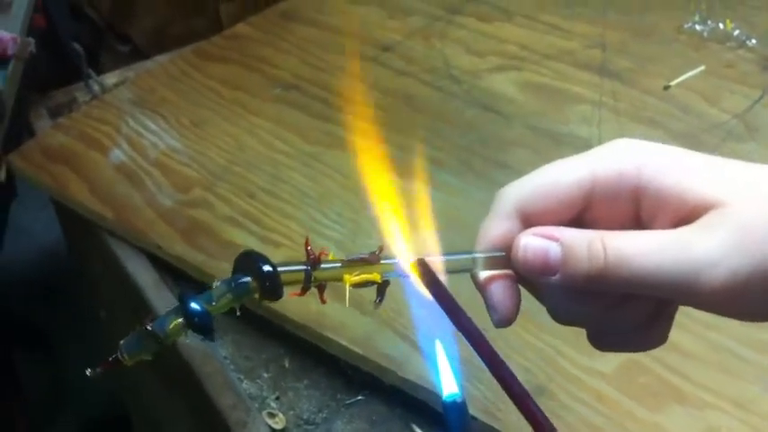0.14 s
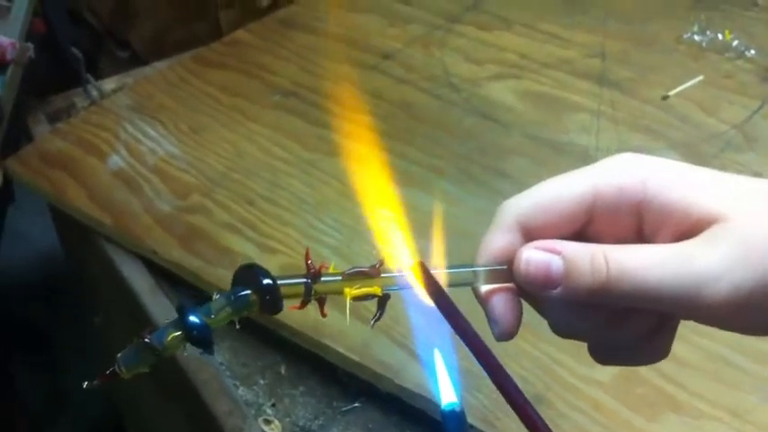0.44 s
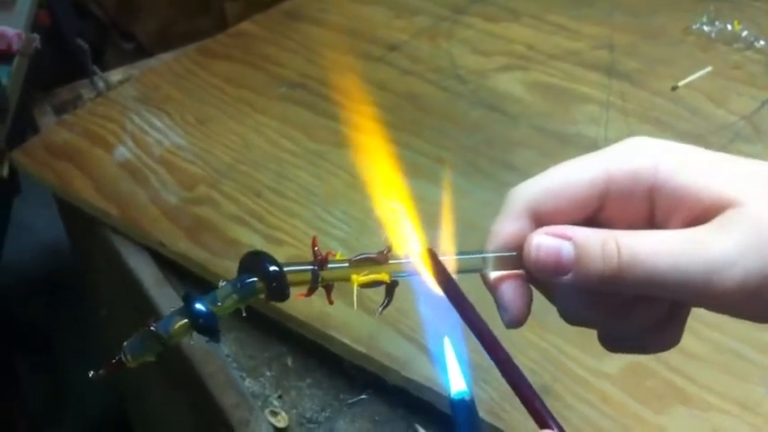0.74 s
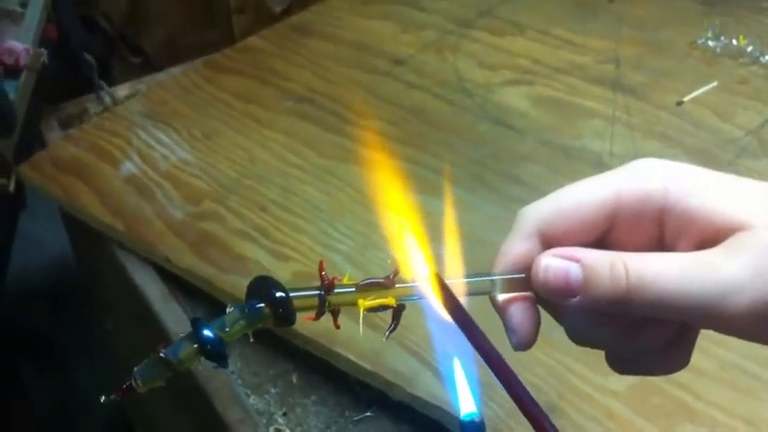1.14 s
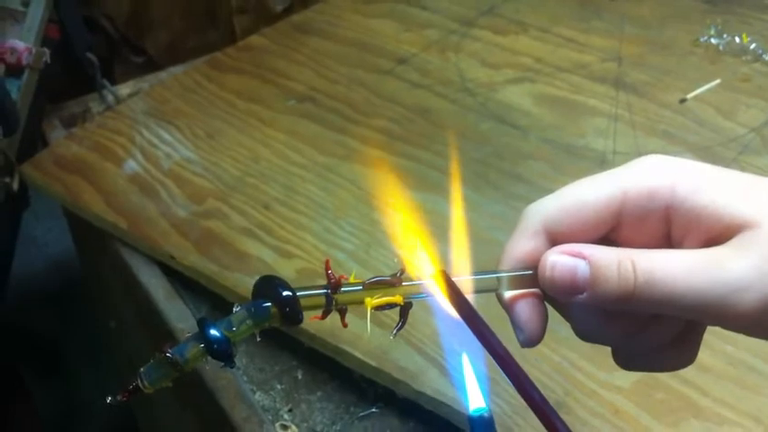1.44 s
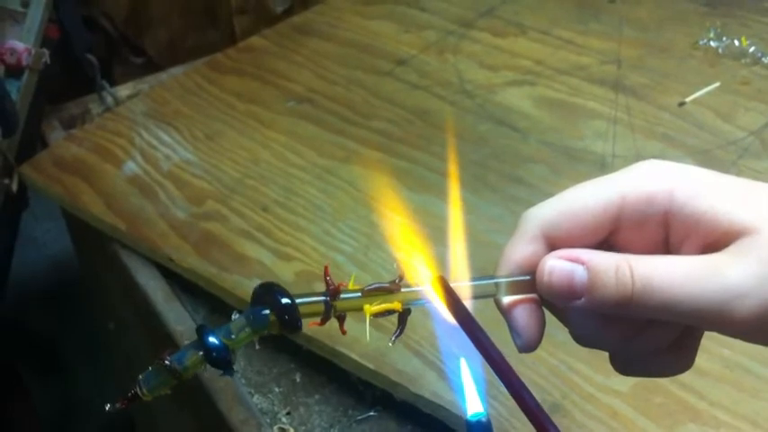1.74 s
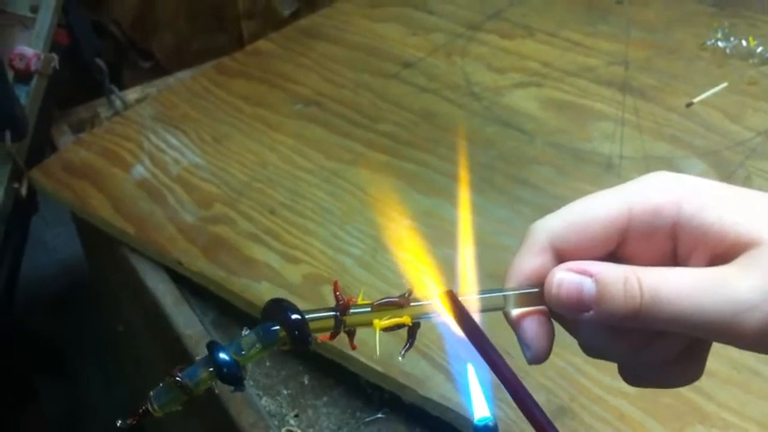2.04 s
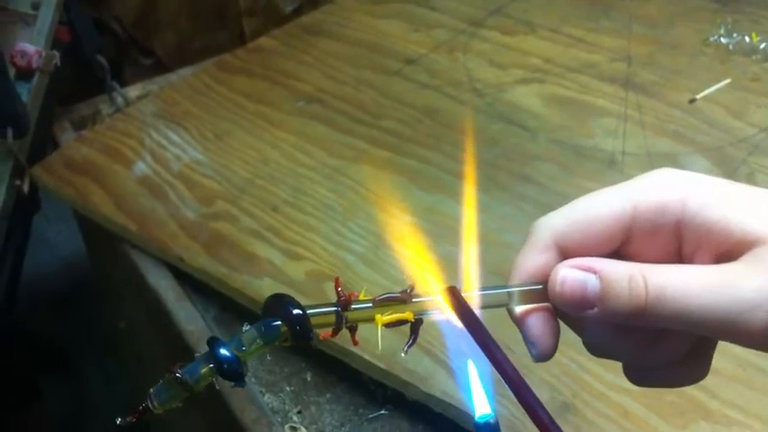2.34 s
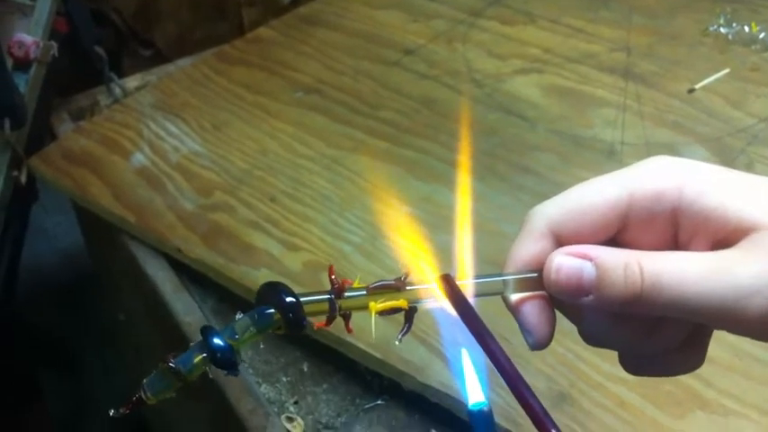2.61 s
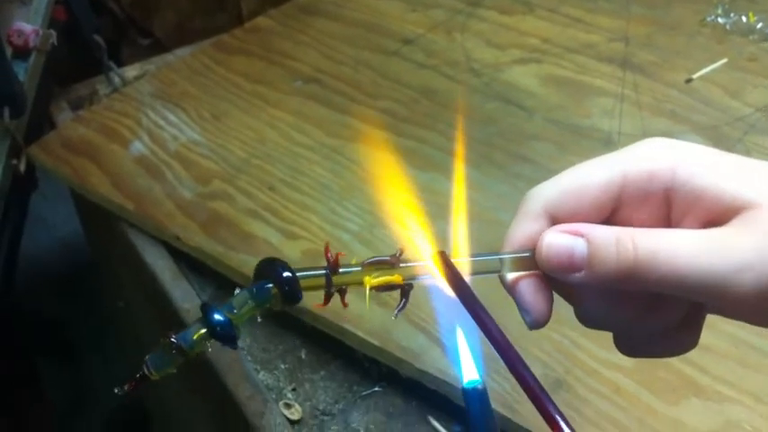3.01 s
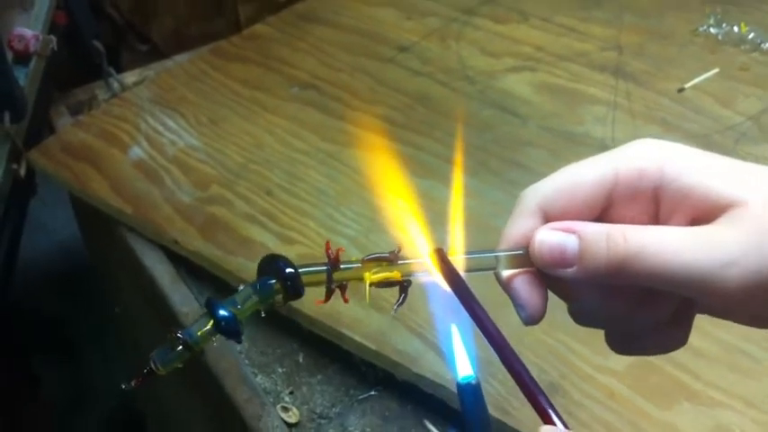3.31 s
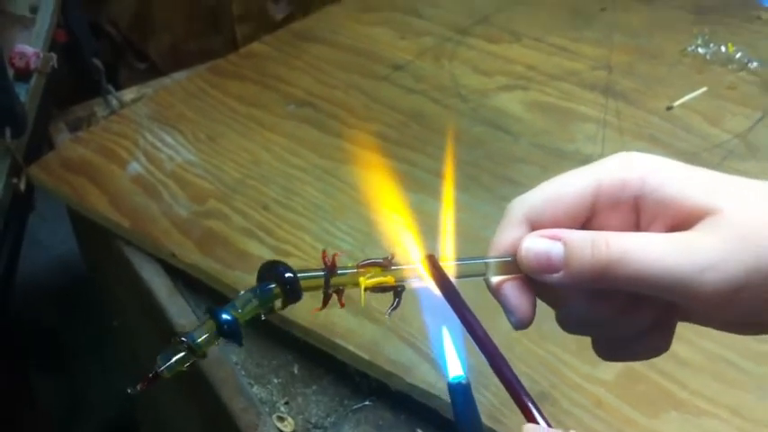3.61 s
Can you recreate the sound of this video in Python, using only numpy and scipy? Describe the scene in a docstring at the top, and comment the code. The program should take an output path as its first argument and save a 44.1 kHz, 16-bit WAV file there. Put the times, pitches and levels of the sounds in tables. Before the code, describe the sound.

A gas torch burns close to the microphone in a small workshop, its rough fluttering roar and steady high hiss continuous throughout, with irregular sputters and a few faint glassy ticks.

```python
"""A small workshop: a glassworker's gas torch burns over a wooden workbench.
The flame's roar is a dense stream of filtered random pops with brief flares, lulls and louder sputters;
a finer stream of pops makes its sizzle. The gas jet hisses as noise in narrow resonances,
faint ticks are decaying noise bursts, and a motor hums as two wavering sines over low room noise."""
import sys
import numpy as np
from scipy import signal
from scipy.fft import rfft, irfft
from scipy.io import wavfile
from scipy.ndimage import uniform_filter1d

SR = 44100
rng = np.random.default_rng(int(sys.argv[2]) if len(sys.argv) > 2 else 0)


def unload_wav(signal):
    """Save mono or channel-first audio to the path in sys.argv[1] as 16-bit WAV at rate SR, clipped to [-1, 1]."""
    wavfile.write(
        sys.argv[1],
        SR,
        np.round(np.clip(np.atleast_2d(signal).T, -1, 1) * 32767).astype(np.int16),
    )


N = 165816
SIZE = 8192  # filter length [samples]
FREQ = np.maximum(np.fft.rfftfreq(SIZE, 1 / SR), 1)  # [Hz]
T = np.arange(N) / SR  # [s]
FLUTTER_HZ = 169.2

# colour of the flame's roar: (frequency [Hz], relative density [dB per Hz])
ROAR_COLOUR = [(94, -41.5), (160, -15.5), (200, -12.5), (250, -10), (335, -7.5), (422, -13.5), (458, -9),
               (498, -12), (619, -4), (800, -2), (1030, -1.5), (1530, -11), (1900, -5), (2180, -7),
               (2330, -13.5), (2830, -18), (3070, -27), (3370, -17), (4200, -31), (5460, -50), (9240, -120)]


def undb(db):
    """Decibels to gain."""
    return 10 ** (np.asarray(db) / 20)


def level(x, db):
    """Scale to an rms level [dB]."""
    rms = np.sqrt(np.mean(x ** 2))
    return x * undb(db) / rms


def curve(points):
    """Interpolate (time [s], level [dB]) points over the scene."""
    time_s, db = np.array(points).T
    return np.interp(T, time_s, db)


def colour(points):
    """Gain over FREQ from (frequency [Hz], level [dB]) points, linear in dB over log frequency."""
    hz, db = np.array(points).T
    return undb(np.interp(np.log(FREQ), np.log(hz), db))


def band(low_hz, high_hz):
    """Band-pass gain with 24 dB per octave skirts."""
    low_cut = 1 / np.hypot(1, (low_hz / FREQ) ** 4)
    high_cut = 1 / np.hypot(1, (FREQ / high_hz) ** 4)
    return low_cut * high_cut


def tilt(db_per_octave):
    """Gain with a constant slope, 0 dB at 1 kHz."""
    return undb(db_per_octave * np.log2(FREQ / 1000))


def resonance(hz, width_hz):
    """Complex response of one resonance, gain 1 at its centre."""
    return 1 / (1 + 1j * (FREQ ** 2 - hz ** 2) / (FREQ * width_hz))


def impulse(gain):
    """Minimum-phase impulse response with this gain, by folding the cepstrum."""
    cepstrum = irfft(np.log(np.abs(gain) + 1e-6))
    cepstrum[1:SIZE // 2] *= 2
    cepstrum[SIZE // 2 + 1:] = 0
    return irfft(np.exp(rfft(cepstrum)))


def through(x, response):
    """Convolve a sound with an impulse response."""
    return signal.fftconvolve(x, response)[:N]


def walk(rate_hz):
    """Smooth random motion, rms 1: held random steps averaged twice."""
    hold = max(int(SR / rate_hz), 1)
    steps = np.repeat(rng.standard_normal(N)[:N // hold + 1], hold)
    smooth = uniform_filter1d(uniform_filter1d(steps, hold), hold)
    return level(smooth[:N], 0)


def pops(rate_per_s, spread_db):
    """Randomly timed pulses of either sign, mostly small and a few large."""
    fires = rng.random(N) < rate_per_s / SR
    size_db = spread_db * np.minimum(rng.exponential(size=N), 4)
    return fires * undb(size_db) * rng.choice([-1, 1], N)


def add(out, start_s, sound, peak_db):
    """Mix a short sound in at a given peak level."""
    i = max(int(start_s * SR), 0)
    scaled = sound * undb(peak_db) / np.abs(sound).max()
    out[i:i + len(sound)] += scaled[:N - i]


def turbulence():
    """Strength of the burning [dB]: a fast random flutter plus brief Gaussian flares and lulls."""
    # (centre [s], Gaussian half length [s], change [dB])
    flare_table = [(0.08, 0.047, -1), (0.166, 0.018, 6), (0.308, 0.0067, 5), (0.366, 0.0072, 7),
                   (.503, 0.0056, -10), (0.567, 0.017, 4), (0.636, 0.0051, -1.5), (0.702, 0.014, -4),
                   (.742, 0.0077, 4), (.869, 0.0066, 5.5), (1.096, 0.01, 7.5), (1.325, 0.014, 4),
                   (1.366, 0.011, -3.5), (1.588, 0.039, 2.5), (1.747, 0.013, 1.5), (2.001, 0.013, -7),
                   (2.194, 0.1, 1.5), (2.414, 0.016, 1), (2.538, 0.013, 3.5), (2.66, 0.014, 0.5),
                   (2.712, .012, -2), (2.807, 0.0075, 7.5), (2.832, .015, 0.5), (2.883, 0.0096, -8),
                   (2.902, 0.006, 4), (3.043, 0.0062, 0), (3.534, 0.017, 3)]
    flutter_db = 1.35
    flares_db = sum(db * np.exp(-.5 * ((T - centre_s) / half_s) ** 2)
                    for centre_s, half_s, db in flare_table)
    return flutter_db * walk(FLUTTER_HZ) + flares_db


def roar(effort_db):
    """Countless small pops merge into a roar whose registers flutter partly on their own."""
    # (low edge [Hz], high edge [Hz], pop spread [dB], own flutter [dB], share of common effort [1])
    registers = [(150, 557, 2, 1.5, 0.22), (516, 1440, 3.5, 1.5, 0.53), (1410, 3380, 2.4, 1.5, 0.9)]
    pops_per_s, roar_db = 3200, -51.5
    out = np.zeros(N)
    for low_hz, high_hz, spread_db, own_db, share in registers:
        flutter_db = share * effort_db + own_db * walk(FLUTTER_HZ)
        pulses = level(pops(pops_per_s, spread_db) * undb(flutter_db), 0)
        out += through(pulses, impulse(colour(ROAR_COLOUR) * band(low_hz, high_hz)))
    return level(out, roar_db)


def sputters():
    """Larger gas pockets burn at once: pops ringing briefly in the roar's colour, dull or bright."""
    # (peak time [s], peak level before trim [dB], brightness [dB per octave])
    sputter_table = [(0.052, -35.5, -7), (0.1626, -36, 17), (.1714, -40, 2), (0.2334, -34, 2),
                     (0.3288, -38, 1), (0.363, -34, 2), (.4093, -35, -5), (0.5624, -32, 7),
                     (0.7428, -32.5, 0.5), (.8698, -35.5, 7), (1.0847, -34, -6), (1.0964, -36, 1),
                     (1.1002, -28.5, 0), (1.2919, -33, -7), (1.3351, -35, -10), (1.4935, -31, -3.5),
                     (1.5063, -41, 2), (1.6914, -34, -6), (1.7172, -42, 6), (1.7554, -29, -2),
                     (1.7907, -38, -5), (1.913, -36, -12), (1.9872, -35.5, -4), (2.0996, -36, -3),
                     (2.115, -36, 16), (2.1591, -34, -1.5), (2.5365, -35, -1), (2.562, -32, 4),
                     (2.6518, -37, -4), (2.6649, -36, 5), (2.8021, -33, -5), (2.8087, -36, -9),
                     (2.8317, -40, -6), (2.899, -31, 4.5), (2.9025, -34, -5), (3.0467, -31, 3.5),
                     (3.2327, -40, 9), (3.319, -33.5, -1), (3.5521, -35, 1), (3.6835, -35, 1)]
    trim_db, low_hz, high_hz = -3.5, 530, 2395
    out = np.zeros(N)
    body = colour(ROAR_COLOUR) * band(low_hz, high_hz)
    for peak_s, db, bright_db in sputter_table:
        pop = impulse(body * tilt(bright_db))
        rise_s = np.abs(pop).argmax() / SR
        add(out, peak_s - rise_s, pop, db + trim_db)
    return out


def sizzle(effort_db):
    """Dense fine pops, stronger as the flame flares, with a surge of their own."""
    # (frequency [Hz], relative density [dB per Hz])
    sizzle_colour = [(2500, -26), (3900, 1.5), (4600, 3.5), (5500, 1.5), (6800, 3), (7400, -30), (9000, 0),
                     (15000, -14)]
    # (time [s], level [dB])
    sizzle_level = [(0, -68), (.5, -66.5), (1.2, -70), (1.8, -71.5), (2.6, -68.5), (3.1, -74), (3.7, -70)]
    surge_hz, surge_db = 54.9, 4
    follow = 1.07  # dB of sizzle per dB of effort
    strength_db = follow * effort_db + surge_db * walk(surge_hz)
    pulses = pops(rate_per_s=10000, spread_db=2) * undb(strength_db)
    fizz = level(through(pulses, impulse(colour(sizzle_colour))), 0)
    return fizz * undb(curve(sizzle_level))


def flame():
    """Roar and sputters ring the resonances of bench and surroundings; sizzle is added uncoloured."""
    # (frequency [Hz], width [Hz], gain re direct sound [dB])
    bench_modes = [(455, 25, -16), (1015.5, 26, -3), (1176, 37, -20.5), (1426, 22, -4), (1632, 33, -2),
                   (1700, 26, -8), (1878, 43, -2.5), (2180, 71, -14.5), (2477, 22, -8)]
    effort_db = turbulence()
    modes = sum(undb(db) * resonance(hz, width_hz) for hz, width_hz, db in bench_modes)
    bench = irfft(1 + modes)  # 1 = direct sound
    return through(roar(effort_db) + sputters(), bench) + sizzle(effort_db)


def workshop(x):
    """Direct sound plus a short, diffuse room tail of decaying noise."""
    t60_s, tail_db, delay_s = 0.055, -10.5, .003
    t = T[:SIZE]
    decay = np.exp(-np.log(1000) * t / t60_s)
    tail = rng.standard_normal(SIZE) * decay * (t > delay_s)
    return x + undb(tail_db) * through(x, tail / np.linalg.norm(tail))


def jet():
    """Gas rushing from the nozzle: noise in fixed, steep-sided resonances, wavering in level."""
    # (frequency [Hz], width before narrowing [Hz], relative gain [dB])
    jet_modes = [(5463, 270, -8), (6620, 233, -6), (6860, 176, 1), (7105, 75, -3), (7815, 265, -3.5),
                 (8060, 102, -3.5), (8830, 480, -10.5), (9390, 450, -6), (9790, 330, -2),
                 (10340, 680, -2.5), (11160, 840, -5.5), (11240, 310, -0.5), (11590, 490, -3),
                 (12550, 1100, -7.5), (12940, 660, -12.5), (14000, 1900, -11), (15400, 450, -7),
                 (15800, 600, -11.5)]
    # (time [s], level before trim and waver [dB])
    hiss_level = [(0.03, -53), (2.8, -51.5), (3.71, -52.5), (3.73, -52.5)]
    trim_db, waver_db, narrowing = 0.66, 0.68, 0.9
    power = 0
    for hz, width_hz, db in jet_modes:
        gain = undb(db) * np.abs(resonance(hz, narrowing * width_hz)) ** 2
        power = power + gain ** 2
    hiss = level(through(rng.standard_normal(N), impulse(np.sqrt(power))), trim_db)
    return hiss * undb(curve(hiss_level) + waver_db * walk(12))


def background():
    """A motor hum of sines wavering in phase and level, over low coloured room noise."""
    # (frequency [Hz], level [dB rms])
    hum_tones = [(115, -86.5), (131, -78.5)]
    # (frequency [Hz], relative density [dB per Hz])
    air_colour = [(15, -6), (40, -28), (70, -17), (100, -13.5), (140, -3), (220, -5.5), (500, -27),
                  (2000, -33)]
    waver_db, air_db = 1, -79
    hum = np.zeros(N)
    for hz, db in hum_tones:
        tone = np.sin(2 * np.pi * hz * T + .5 * walk(5.86))  # phase drift 0.5 rad rms
        hum += level(tone * undb(waver_db * walk(10)), db)
    air = through(rng.standard_normal(N), impulse(colour(air_colour)))
    return hum + level(air, air_db)


def ticks():
    """Tiny dry cracks, probably from heated glass: decaying noise bursts through broad resonances."""
    # (frequency [Hz], width before cubing [Hz], relative gain [dB])
    glass_modes = [(5500, 1050, 4), (9000, 1600, -1), (11300, 3000, -1.5), (14100, 2200, -9)]
    # (start [s], peak level [dB], brightness [dB per octave], burst decay constant [s])
    tick_table = [(0.156, -45, -1, .0004), (0.163, -35.5, 0, 0.00052), (.56, -48, -8, .0015),
                  (1.083, -47, 1, .001), (1.091, -45, -2, .0009), (2.1048, -35.5, 4, 0.0028),
                  (2.112, -40, -1, 0.0036)]
    out = np.zeros(N)
    ring = sum(undb(db) * np.abs(resonance(hz, width_hz)) ** 3 for hz, width_hz, db in glass_modes)
    for start_s, db, bright_db, decay_s in tick_table:
        crack = rng.standard_normal(SIZE) * np.exp(-T[:SIZE] / decay_s)
        add(out, start_s, through(crack, impulse(ring * tilt(bright_db))), db)
    return out


def scene():
    """The flame in the room, with ticks, jet and background added dry; one channel."""
    return (workshop(flame()) + ticks() + jet() + background())[None]


def record(dry):
    """Cut the top of the treble with a steep elliptic low-pass."""
    top_hz = 15750
    low_pass = signal.ellip(12, .1, 80, top_hz, fs=SR, output="sos")  # ripple, stopband [dB]
    return signal.sosfilt(low_pass, dry)


dry = scene()
out = record(dry)
unload_wav(out)
```